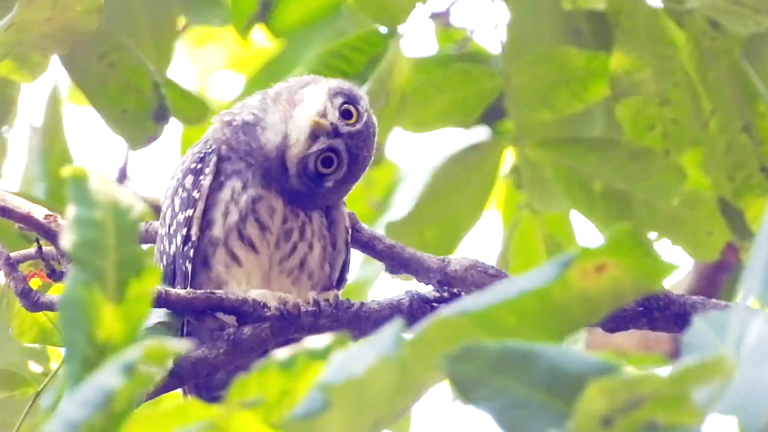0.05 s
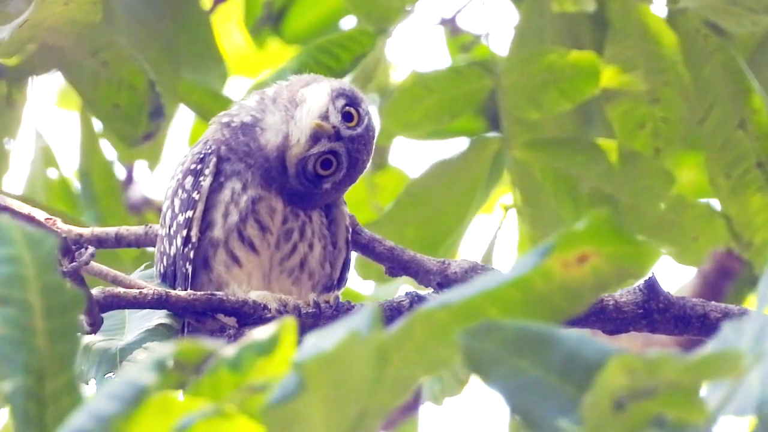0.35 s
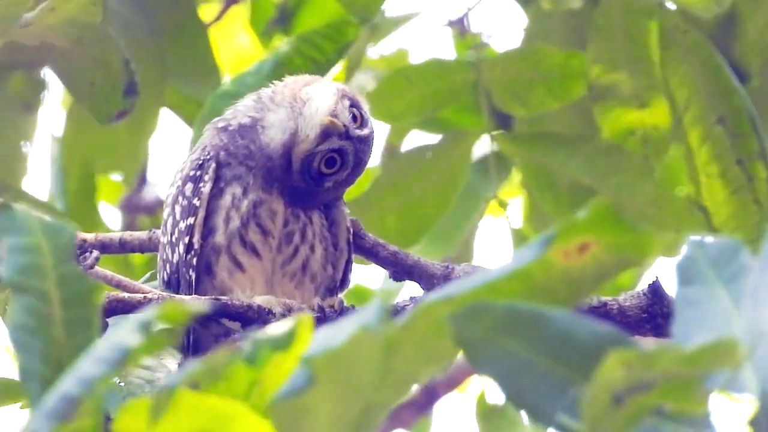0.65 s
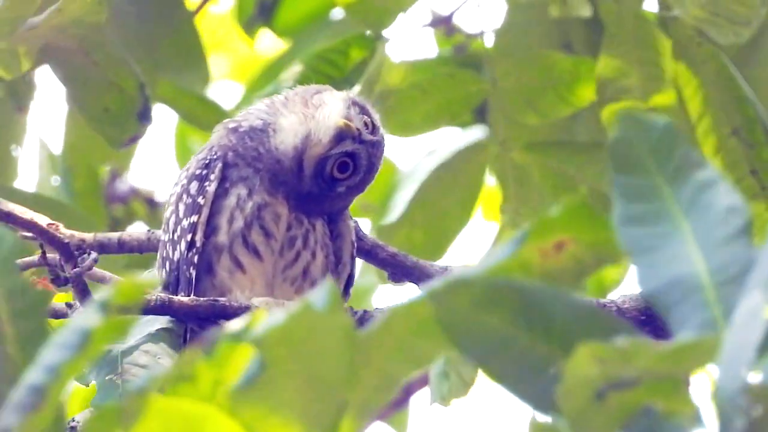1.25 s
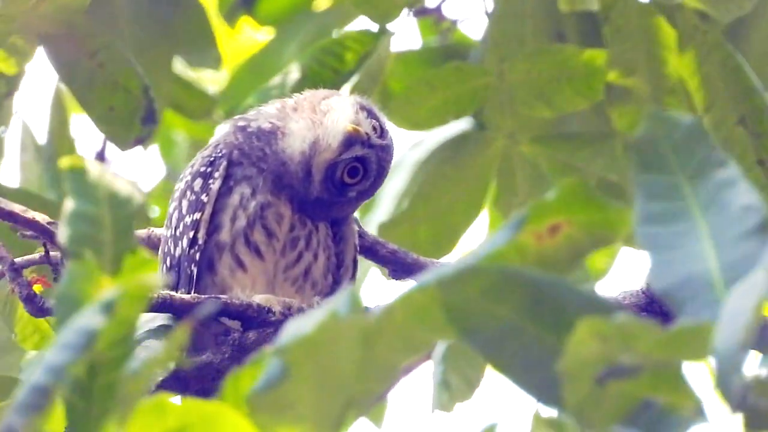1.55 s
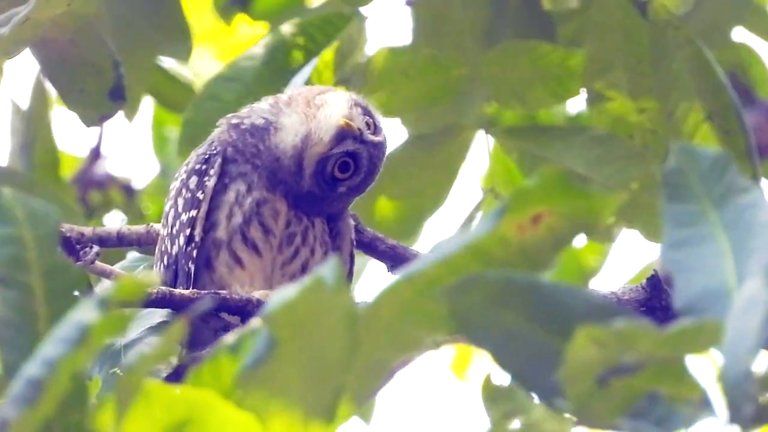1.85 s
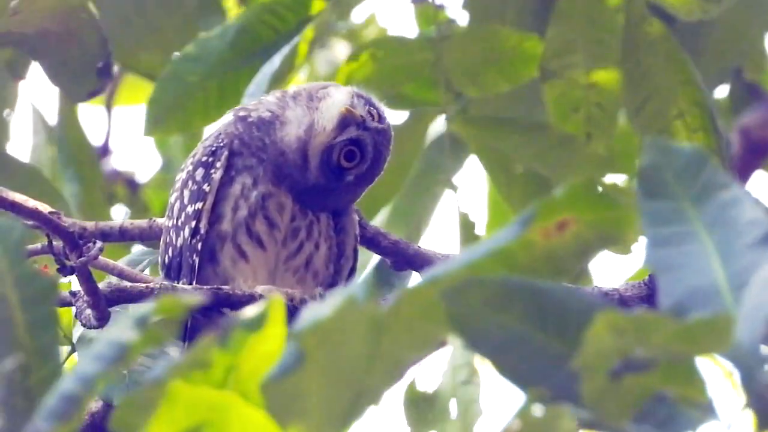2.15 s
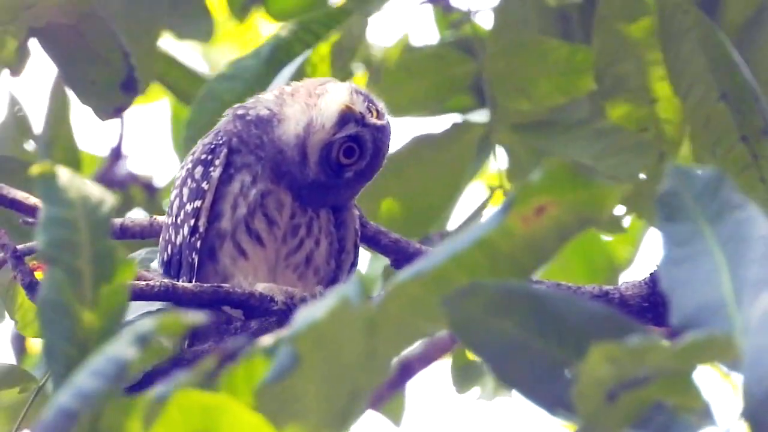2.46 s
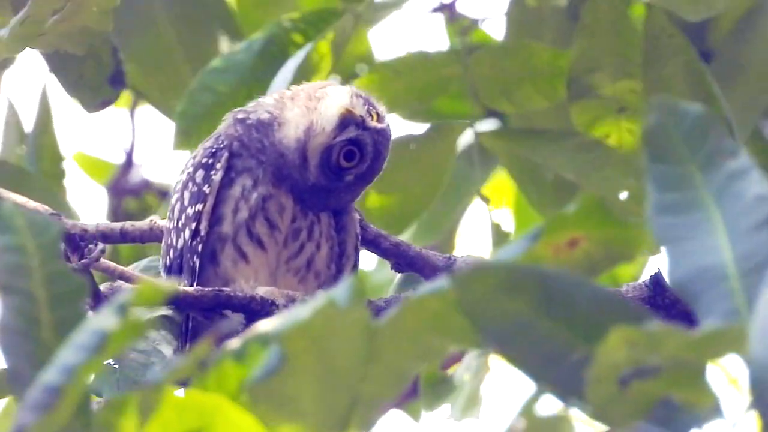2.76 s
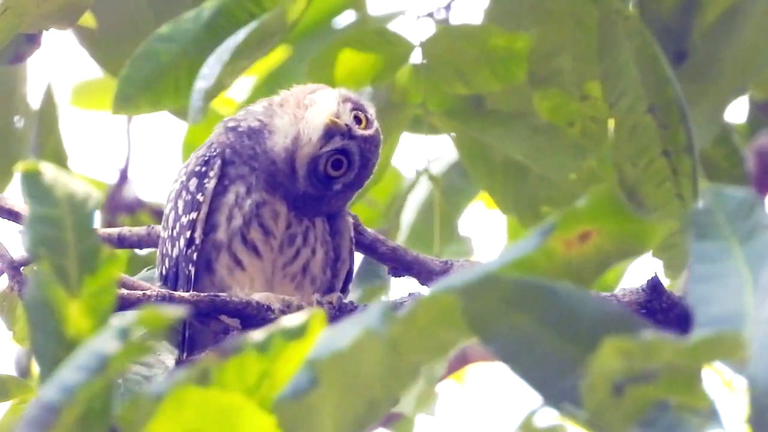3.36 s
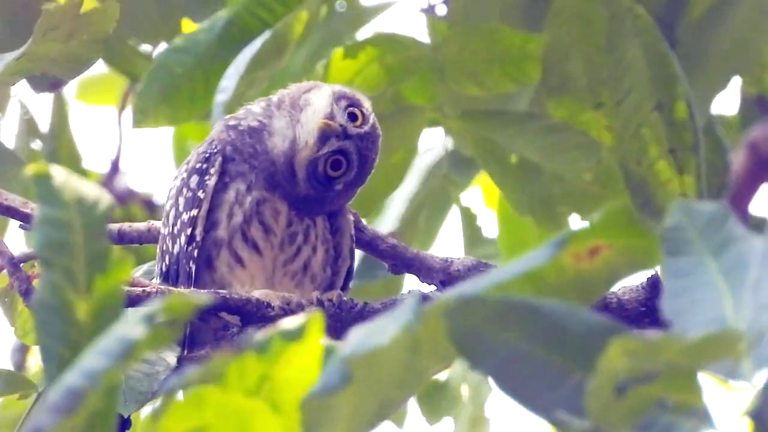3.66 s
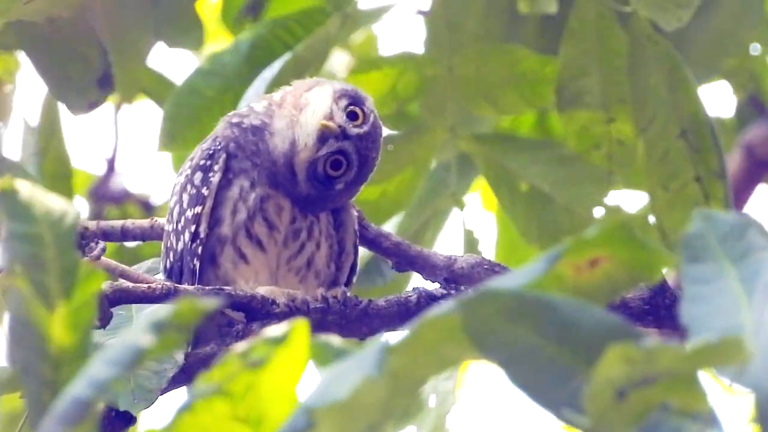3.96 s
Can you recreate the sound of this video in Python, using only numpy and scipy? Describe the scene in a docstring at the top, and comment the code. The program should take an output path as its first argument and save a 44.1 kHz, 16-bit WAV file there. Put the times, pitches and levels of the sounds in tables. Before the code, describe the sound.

A small bird chirps rapidly over a steady outdoor rush and hiss.

```python
"""A resonant outdoor rush with a high hiss fades in. A small bird in a leafy tree gives a fast
series of thin rising chirps, joined from 1.4 s by softer arched whistles. The camera is handled:
low rubbing under the song, a few dull knocks from 3.2 s, one sharp click at 3.5 s and a faint
one just after. The background ends quieter."""
import sys
import numpy as np
from scipy import signal
from scipy.fft import rfft, irfft
from scipy.io import wavfile
from scipy.ndimage import uniform_filter1d

SR = 44100
rng = np.random.default_rng(int(sys.argv[2]) if len(sys.argv) > 2 else 0)


def master_out(mix):
    """Clip the mix to full scale and print it as 16-bit PCM to the path in sys.argv[1]."""
    frames = np.transpose(np.atleast_2d(mix))
    ceiling = np.clip(frames, -1, 1)
    pcm = np.round(ceiling * 32767).astype(np.int16)
    wavfile.write(sys.argv[1], SR, pcm)


N = 176400
SIDE = np.array([[1], [-1]])  # opposite polarity left and right
# Spectrum of the clicks and their haze. Each row: frequency in Hz, density in dB.
CLICK_COLOUR = [(300, -12), (1000, -2), (2500, -5), (4200, 1), (8000, 0), (11000, -10), (15000, -19)]


def undb(db):
    return 10 ** (np.asarray(db) / 20)


def clock():
    return np.arange(N) / SR


def progress(length_s):
    return np.linspace(0, 1, int(length_s * SR))


def unit(x):
    return x / np.sqrt(np.mean(x ** 2))


def pan(left_db):
    return undb(np.array([[left_db], [-left_db]]) / 2)


def add(out, start_s, x):
    i = int(start_s * SR)
    out[..., i:i + x.shape[-1]] += x[..., :N - i]


def curve(rows):
    """Gain over time from (s, dB) points."""
    return undb(np.interp(clock(), *np.array(rows).T))


def noise(points, skirt_db=60):
    """Unit-RMS noise shaped by (Hz, dB) points, falling skirt_db per octave outside them."""
    hz, db = np.array(sorted(points)).T
    octave, knots = np.log2(np.arange(N // 2 + 1) * SR / N + 1e-3), np.log2(hz)
    outside = abs(octave - np.clip(octave, knots[0], knots[-1]))
    gain_db = np.interp(octave, knots, db) - skirt_db * outside
    return unit(irfft(rfft(rng.standard_normal(N)) * undb(gain_db), N))


def band(hz, width_hz):
    """Unit-RMS noise in one steep resonance."""
    f = np.arange(N // 2 + 1) * SR / N
    return unit(irfft(rfft(rng.standard_normal(N)) / (1 + (2 * (f - hz) / width_hz) ** 2), N))


def walk(rate_hz):
    """Smooth random drift, unit RMS."""
    hold = max(int(SR / rate_hz), 2)
    steps = np.repeat(rng.standard_normal(N // hold + 1), hold)
    return unit(uniform_filter1d(uniform_filter1d(steps, hold), hold)[:N])


def whistle(hz, db, attack_s, release_s, overtone_db=-52, waver=.008, flutter_db=2.6):
    """A nearly pure bird note on a pitch path, unsteady in pitch and level."""
    t = np.arange(len(hz)) / SR
    slip, flutter = (np.interp(t * 350, np.arange(128), r) for r in rng.standard_normal((2, 128)))
    phase = 2 * np.pi * np.cumsum(hz * (1 + waver * slip)) / SR
    tone = np.sin(phase) + undb(overtone_db) * np.sin(2 * phase)
    envelope = np.clip(t / attack_s, 0, 1) * np.clip((t[-1] - t) / release_s, 0, 1)
    return np.sqrt(2) * envelope * undb(db + flutter_db * flutter) * tone


def chirps(swell_db_per_octave=29, top_fade_db=-9.5):
    """Each chirp swells as it climbs to a knee, then flicks upward and fades."""
    # Each row: start and length in seconds, start, knee and end pitch in Hz, knee place from 0 to 1,
    # climb exponent (over 1 lingers at the start), knee level in dB.
    notes = [(.333, .082, 5600, 5750, 6950, .62, 3, -32), (.508, .096, 5480, 5720, 7250, .69, 5, -26),
             (.692, .099, 5480, 5850, 7250, .76, 2.5, -23.5), (.888, .089, 5440, 5700, 7400, .69, 4, -27.5),
             (1.07, .069, 3950, 4800, 6950, .47, .65, -26.5),
             (1.238, .085, 3850, 4950, 7200, .53, .75, -26),
             (1.403, .084, 3750, 4950, 7350, .55, .6, -22.5),
             (1.572, .078, 3800, 4800, 7100, .53, .6, -22.5), (1.736, .084, 3850, 4950, 7300, .52, .6, -24),
             (1.91, .087, 4100, 4880, 7300, .57, 1.2, -24), (2.122, .103, 3000, 4850, 6050, .83, 1.3, -24),
             (2.354, .099, 2950, 4950, 6200, .78, 1.15, -24.5),
             (2.596, .086, 3050, 4950, 6350, .78, 1, -24), (2.79, .07, 2950, 3600, 3800, .85, 1.8, -41),
             (2.853, .052, 4100, 5050, 5950, .76, 1.8, -24.5), (3.05, .08, 3100, 4900, 5200, .88, 1, -31.5)]
    out = np.zeros(N)
    for start_s, length_s, low_hz, knee_hz, high_hz, place, bow, db in notes:
        u = progress(length_s)
        climb = np.minimum(u / place, 1) ** bow
        flick = np.maximum(u - place, 0) / (1 - place)
        hz = low_hz + (knee_hz - low_hz) * climb + (high_hz - knee_hz) * flick
        swell_db = swell_db_per_octave * np.minimum(np.log2(hz / knee_hz), 0)
        add(out, start_s, whistle(hz, db + swell_db + top_fade_db * flick, attack_s=.013, release_s=.004))
    return out


def pips(length_s=.0278, rise=.117):
    """Faint, short rising notes between the chirps."""
    # Each row: start in seconds, start pitch in Hz, level in dB.
    notes = [(.2, 6200, -38.5), (2.095, 5140, -33.5), (2.307, 6530, -37.5), (2.325, 5150, -35.5),
             (2.55, 4960, -39), (2.761, 6330, -40.5), (2.78, 5170, -40)]
    out = np.zeros(N)
    for start_s, low_hz, db in notes:
        hz = low_hz * (1 + rise * progress(length_s))
        add(out, start_s, whistle(hz, db, attack_s=.0034, release_s=.0026))
    return out


def slurs():
    """Hoarse notes that fall ever faster."""
    # Each row: start and length in seconds, start and end pitch in Hz, level in dB, overtone in dB.
    notes = [(.088, .075, 2800, 2700, -44, -30), (1.24, .09, 3850, 3250, -43, -30),
             (2.824, .024, 4250, 4230, -38, -18), (2.842, .02, 4280, 4100, -29.5, -26),
             (2.87, .11, 2750, 2550, -49, -30), (2.893, .067, 5320, 3850, -28, -26),
             (2.948, .016, 6500, 5700, -34.5, -45), (3.384, .035, 4080, 3750, -38.5, -30),
             (3.444, .038, 4780, 3900, -30, -26)]
    out = np.zeros(N)
    for start_s, length_s, high_hz, low_hz, db, overtone_db in notes:
        hz = high_hz + (low_hz - high_hz) * progress(length_s) ** 2.8
        add(out, start_s, whistle(hz, db, .0043, .0038, overtone_db, waver=.018, flutter_db=3.2))
    return out


def arches(droop=.19, dip_place=.65, dip_width=.13):
    """Soft lower whistles that rise, dip in level after the top, and fall."""
    # Each row: start and length in seconds, top pitch in Hz, level in dB, dip in dB.
    notes = [(1.41, .15, 3650, -40.5, -6), (1.642, .145, 3620, -42, -22), (1.878, .15, 3570, -42.5, -9),
             (2.115, .155, 3570, -42, -8), (2.352, .158, 3560, -40.5, -12), (2.592, .155, 3520, -38, -6)]
    out = np.zeros(N)
    for start_s, length_s, top_hz, db, dip_db in notes:
        u = progress(length_s)
        hz = top_hz * (1 - droop * abs(2 * u - 1) ** 2.9)
        dip = np.exp(-((u - dip_place) / dip_width) ** 2)
        add(out, start_s, whistle(hz, db + dip_db * dip, .0042, .016, waver=.019, flutter_db=3.2))
    return out


def birdsong(lag_s=8.2e-6, trees_t60_s=.32, trees_db=-6):
    """Near calls reach the two microphones slightly apart; all calls scatter in the trees."""
    near = chirps() + pips() + slurs()
    soft = arches()
    hz = np.arange(N // 2 + 1) * SR / N
    late = irfft(rfft(near) * np.exp(-2j * np.pi * hz * lag_s), N)
    tail = rng.standard_normal((2, N)) * undb(-60 * clock() / trees_t60_s)
    tail /= np.sqrt(np.sum(tail ** 2, axis=1, keepdims=True))
    scatter = signal.fftconvolve((near + soft)[None], tail, axes=1)[:, :N]
    return np.array([near, late]) * pan(-1.5) + soft + undb(trees_db) * scatter


def knocks(rise_s=.00078, decay_s=.003, body_hz=435, body_decay_s=.0058, body_db=-13.5):
    """Heavily damped knocks on the camera, with a faint body ring."""
    # Each row: start in seconds, ring in Hz, level in dB.
    hits = [(3.2485, 453, -12), (3.2634, 368, -18.5), (3.2793, 686, -21.5), (3.364, 250, -41),
            (3.37, 390, -19.5), (3.3741, 414, -21.5), (3.381, 400, -26), (3.489, 415, -26.5)]
    out, t = np.zeros((2, N)), clock()[:SR // 8]
    blow = np.minimum(t / rise_s, 1) * np.exp(-np.maximum(t - 2 * rise_s, 0) / decay_s)
    body = undb(body_db) * np.exp(-t / body_decay_s) * np.sin(2 * np.pi * body_hz * t)
    for start_s, hz, db in hits:
        add(out, start_s, undb(db) * (body - blow * np.sin(2 * np.pi * hz * t)))
    return out


def clicks(decay_s=.003, tail_s=.022, tail_db=-20):
    """Sharp handling clicks: bright noise bursts with a faint tail."""
    # Each row: start in seconds, level in dB.
    hits = [(3.4886, -19), (3.6385, -44)]
    out, t = np.zeros((2, N)), clock()[:SR // 8]
    envelope = np.exp(-t / decay_s) + undb(tail_db) * np.exp(-t / tail_s)
    for start_s, db in hits:
        crack = np.array([noise(CLICK_COLOUR)[:len(t)] for _ in range(2)])
        add(out, start_s, undb(db) * pan(-5.3) * crack * envelope)
    return out


def click_haze(rise_s=.008, fall_s=.01, grain_db=2.5):
    """A brief grainy haze of noise that swells into each click and dies away."""
    # Each row: peak time in seconds, level in dB.
    peaks = [(3.487, -32.5), (3.644, -49)]
    t = clock()
    swell = sum(undb(db) * np.exp(-np.maximum((at - t) / rise_s, (t - at) / fall_s)) for at, db in peaks)
    haze = np.array([noise(CLICK_COLOUR), noise(CLICK_COLOUR)])
    return haze * pan(-3.3) * swell * undb(grain_db * walk(600))


def rubs(width_hz=110, side_db=-1, low_cut_hz=134):
    """Brief soft rubs on the camera body."""
    # Each row: start and length in seconds, centre in Hz, level in dB.
    strokes = [(0.785, 0.04, 268, -40.5), (1.045, 0.04, 295, -41), (1.133, 0.1, 218, -38.5),
               (1.403, 0.04, 255, -40), (1.61, 0.05, 185, -43), (1.874, 0.055, 190, -42.5),
               (2.93, 0.2, 200, -47)]
    out = np.zeros((2, N))
    for start_s, length_s, hz, db in strokes:
        swell = np.sin(np.pi * progress(length_s))
        friction = band(hz, width_hz) + undb(side_db) * SIDE * band(hz, width_hz)
        add(out, start_s, undb(db) * swell * friction[:, :len(swell)])
    return signal.sosfilt(signal.butter(4, low_cut_hz, "high", fs=SR, output="sos"), out)


def rumble(gain_db=-1, flicker_db=4.5):
    """Uneven low handling noise."""
    # Each row: frequency in Hz, density in dB.
    colour = [(25, -38), (45, -33), (65, -17.5), (90, -19.5), (160, -1.5), (230, 0), (330, -7.5),
              (600, -7.5), (1500, -21)]
    # Each row: time in seconds, relative level in dB.
    levels = [(0.1, -55), (0.95, -48), (0.97, -47), (1.2, -46.5), (1.27, -51), (1.44, -48.5), (1.46, -51.5),
              (1.91, -42), (1.96, -57), (2.08, -53), (2.73, -50.5), (3.05, -44), (3.2, -52), (3.27, -39.5),
              (3.31, -58), (3.37, -41.5), (3.43, -60), (4.0, -60.5)]
    gain = curve(levels) * undb(gain_db - flicker_db * walk(23.42))
    return np.array([noise(colour), noise(colour)]) * gain


def rush(gain_db=-.5, side_db=-21, flicker_db=2.04):
    """A distant resonant rush, nearly centred."""
    # Each row: frequency in Hz, density in dB.
    bass = [(30, -64), (100, -37), (170, -22.5)]
    resonances = [(180, -47), (300, -21.5), (367, -9), (408, -35), (510, -11.5), (583, -24.5), (694, -6.5),
                  (794, -10), (866, -2), (972, -11), (1020, -11), (1140, 1.5), (1210, -2.5), (1300, -1),
                  (1370, -9.5), (1570, -7.5), (1720, -1.5), (1930, -6.5), (2100, -5), (2200, -5),
                  (2400, -15.5), (2750, -20), (3000, -17), (3900, -107), (6600, -120)]
    # Each row: time in seconds, relative level in dB.
    levels = [(0.1, -37), (0.14, -32), (0.2, -36.5), (0.21, -35), (0.27, -34.5), (0.95, -30.5), (1.6, -35),
              (1.61, -29.5), (1.79, -32.5), (1.9, -32), (2.3, -33.5), (2.75, -34), (3.26, -36.5),
              (3.35, -41), (3.37, -35.5), (3.48, -41), (3.56, -47), (3.63, -41), (3.86, -42.5),
              (4.0, -37.5)]
    colour = list(bass) + list(resonances)[1:-1]
    air = noise(colour, skirt_db=50) + undb(side_db) * SIDE * noise(colour)
    return air * curve(levels) * undb(gain_db + flicker_db * walk(14))


def hiss(top_hz=8020, flicker_db=.19):
    """A wide high hiss with thin whines from the sides."""
    # Each row: frequency in Hz, density in dB.
    mid_colour = [(1650, -41), (2800, -13), (3070, -15), (3360, -9), (3580, -7.5), (3890, -6.5), (4360, -2),
                  (4610, 2), (5230, -4), (5610, 2.5), (5810, 6.5), (5980, 0), (6240, -9.5), (6640, -3.5),
                  (7330, -1.5), (8030, -13), (8370, -15), (10100, -22.5), (10600, -36), (11500, -42),
                  (15000, -51)]
    side_colour = [(880, -54), (1500, -114), (2040, -51), (2360, -22.5), (3890, -15), (4590, -5),
                   (5300, -26), (5610, 8), (6180, -20), (7350, 4), (8410, -24), (9540, -14), (10600, -6),
                   (11300, -43), (15000, -41)]
    # Each row: time in seconds, relative level in dB.
    levels = [(.1, -33), (.6, -31), (1.5, -33.5), (2.5, -36), (3.3, -34.5), (3.47, -36.5), (3.53, -41.5),
              (3.8, -40), (4, -38)]
    # Each row: centre in Hz, width in Hz, level in dB.
    side_bands = [(5760, 92, -53), (7440, 130, -57), (7000, 130, -60), (7900, 48, -61), (8100, 38, -51)]
    gain = curve(levels)
    air = (noise(mid_colour) + SIDE * noise(side_colour)) * gain * undb(flicker_db * walk(27))
    air = signal.sosfilt(signal.butter(4, top_hz, fs=SR, output="sos"), air)
    thin = sum(band(hz, width_hz) * undb(db) for hz, width_hz, db in side_bands)
    return air + SIDE * thin * unit(gain)


def sizzle(gain_db=.5, mid_db=.5, flicker_db=2):
    """The flickering top of the hiss."""
    # Each row: frequency in Hz, density in dB.
    colour = [(8300, 5), (9400, 11.5), (10000, 9.5), (10600, 5.5), (11300, -6.5), (14500, -24)]
    # Each row: time in seconds, relative level in dB.
    levels = [(.1, -96), (.55, -57), (.8, -54), (1.6, -57.5), (2.1, -60), (2.7, -64.5), (3.25, -52.5),
              (3.5, -60), (3.6, -63.5), (4, -69)]
    air = undb(mid_db) * noise(colour, skirt_db=185) + SIDE * noise(colour, skirt_db=202)
    return air * curve(levels) * undb(gain_db + flicker_db * walk(14))


def whines(flicker_db=2):
    """Narrow background bands that swell and fade."""
    # Each row: centre and width in Hz, peak level in dB, peak time and spread in seconds.
    bands = [(860, 45, -50.5, 0.9, 1.2), (1190, 34, -39.5, 1.55, 1.1), (1262, 50, -41, 1.3, 1.0),
             (1282, 18, -41, .23, .12), (1443, 25, -54, 1.8, 1.5), (1715, 60, -48, 1.6, 1.4),
             (2016, 45, -50, 2, 1.5), (2137, 16, -42.5, 2.3, .3), (2190, 110, -43, 2.2, .2),
             (1560, 200, -41.5, 2.2, .25), (4685, 60, -46, 1.6, 1.6), (5526, 45, -47, 1.2, 1.5),
             (5801, 16, -40, .75, .9)]
    out, t = np.zeros(N), clock()
    for hz, width_hz, db, peak_s, spread_s in bands:
        swell = 1 / np.hypot(1, ((t - peak_s) / spread_s) ** 2)
        out += band(hz, width_hz) * undb(db + flicker_db * walk(9.87)) * swell
    return out


def drone(level_db=-51):
    """Steady low drone of the surroundings."""
    # Each row: frequency in Hz, density in dB.
    colour = [(150, -8), (230, -5.5), (310, 3), (372, -5), (405, 4), (437, 7.5), (520, 1.5), (620, 7.5)]
    return undb(level_db) * noise(colour)


def scene(impact_cut_hz=200):
    """Bird and handling noise over the outdoor background."""
    song = birdsong()
    background = rush() + (hiss() + sizzle()) * pan(-1) + whines() + drone()
    low_cut = signal.butter(3, impact_cut_hz, "high", fs=SR, output="sos")
    handling = rumble() + rubs() + signal.sosfilt(low_cut, knocks() + clicks()) + click_haze()
    return song + handling + background


def record(dry, start_s=.071, fade_s=.023, floor_db=-46, top_hz=15300):
    """Quick fade-in and a steep treble cut."""
    fade = np.clip((clock() - start_s) / fade_s, 0, 1) ** 2
    low_pass = signal.ellip(8, .2, 70, top_hz, fs=SR, output="sos")
    return signal.sosfilt(low_pass, dry * (fade + undb(floor_db)))


dry = scene()
out = record(dry)
master_out(out)
```